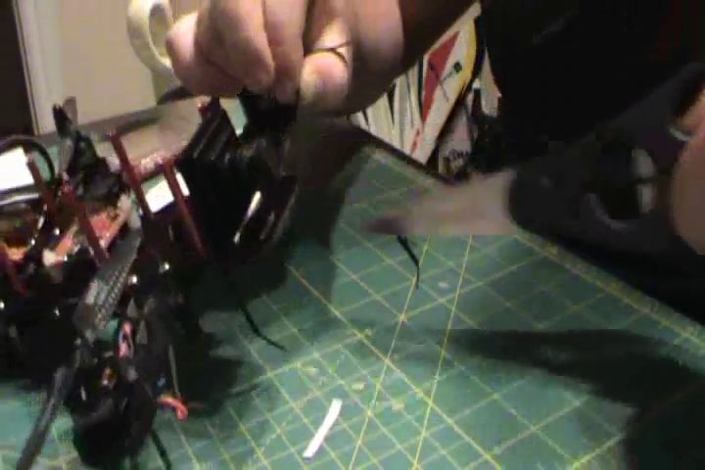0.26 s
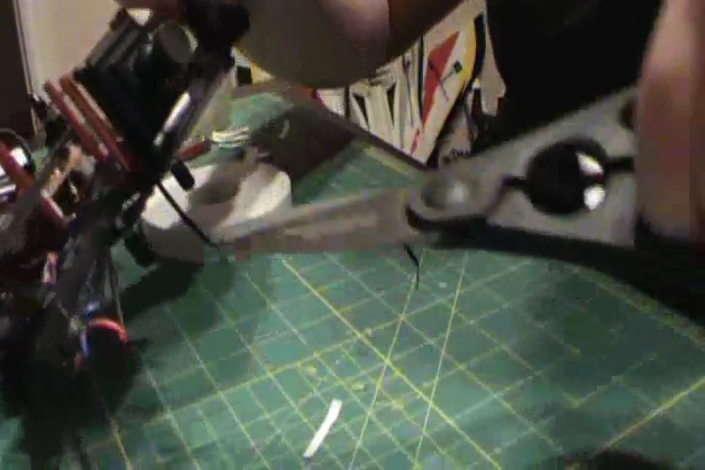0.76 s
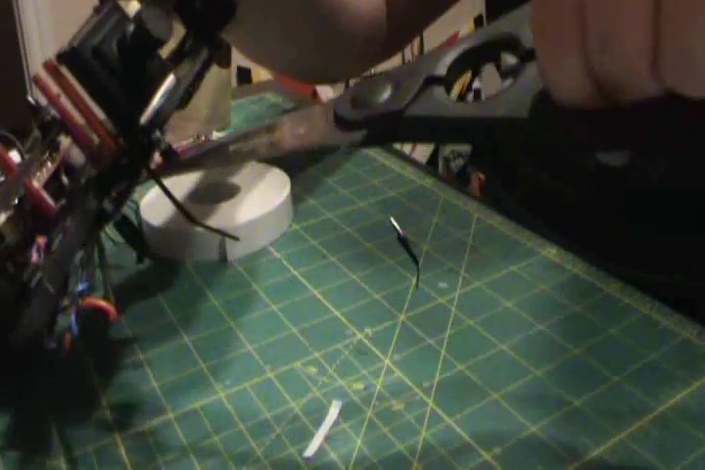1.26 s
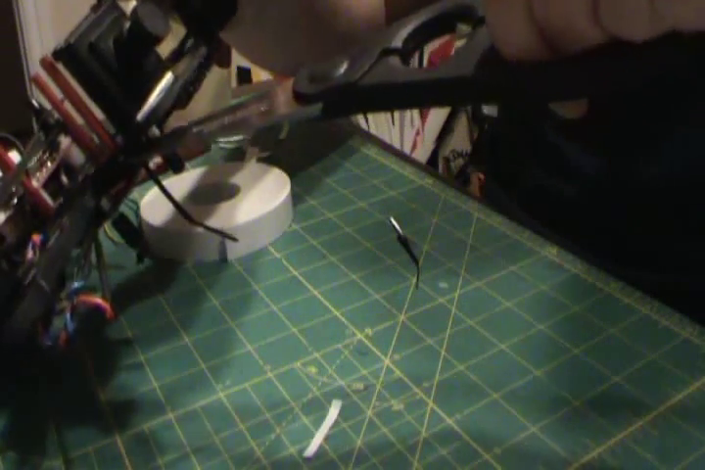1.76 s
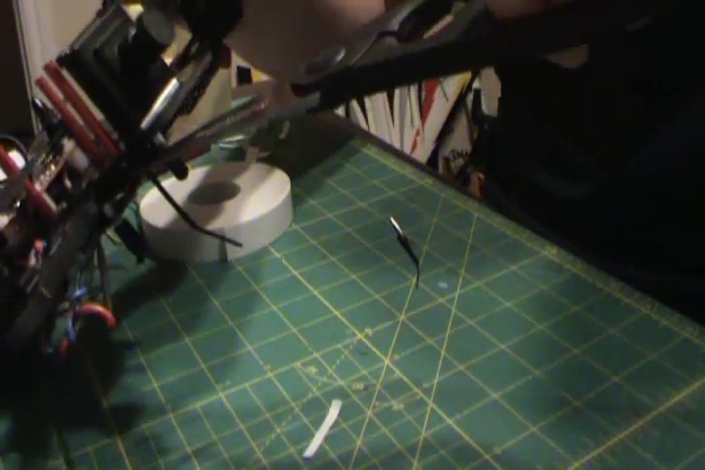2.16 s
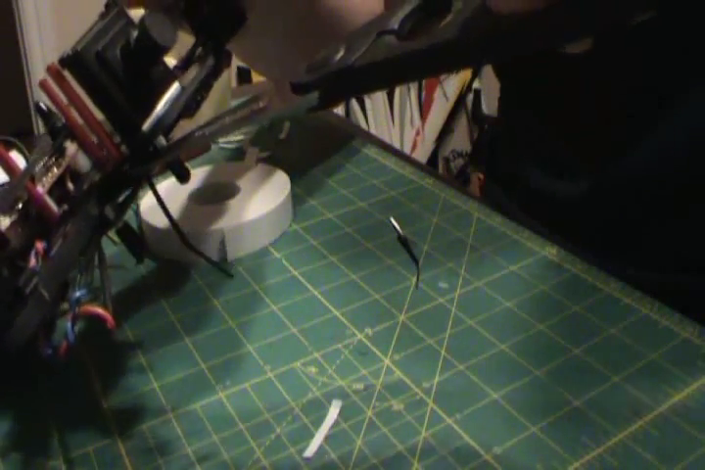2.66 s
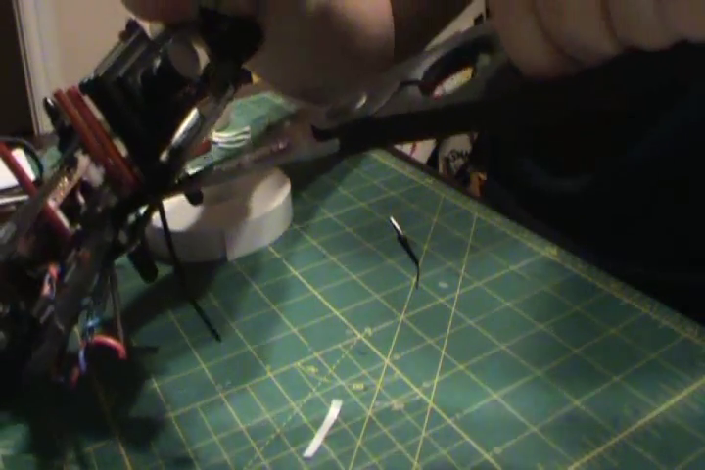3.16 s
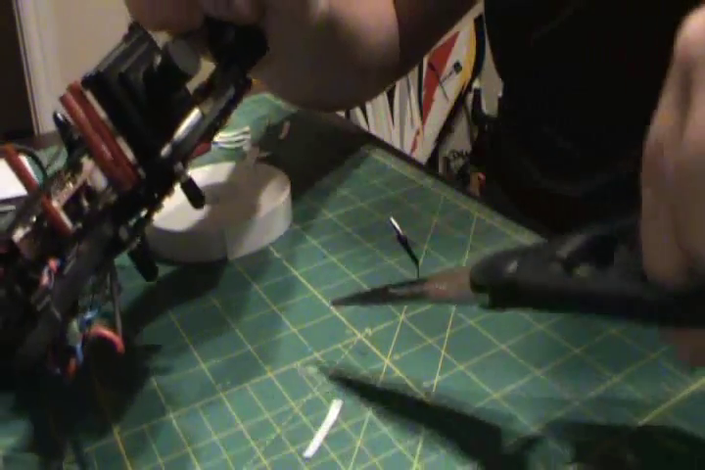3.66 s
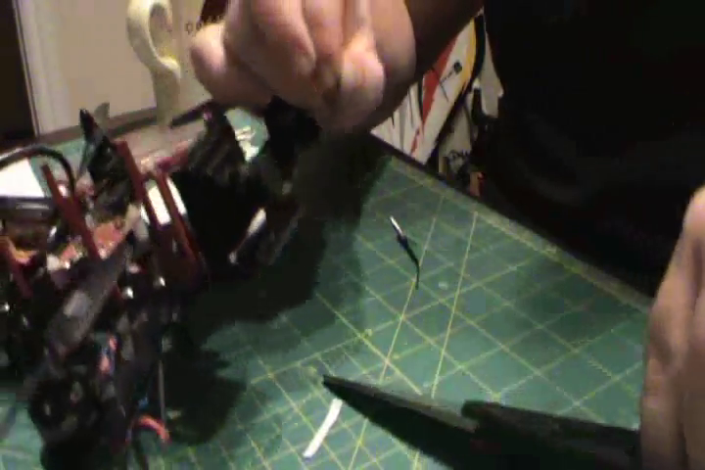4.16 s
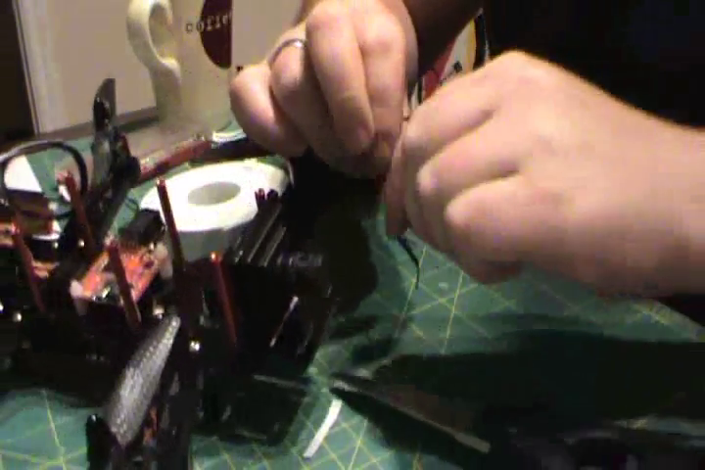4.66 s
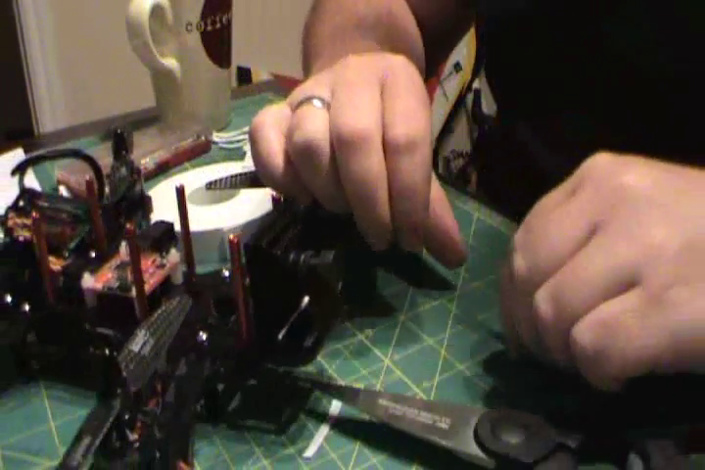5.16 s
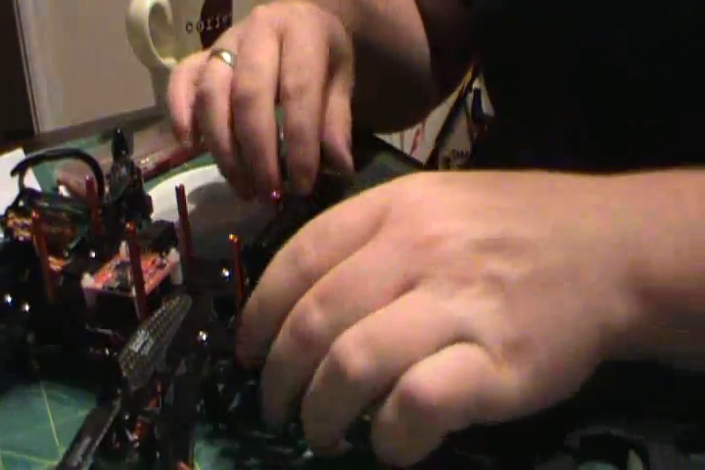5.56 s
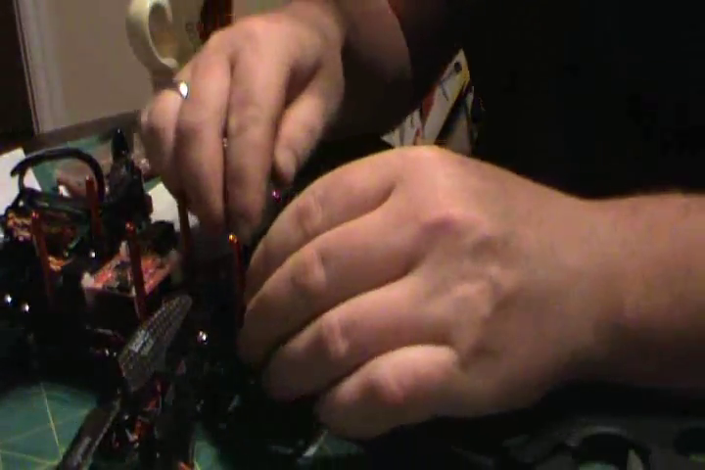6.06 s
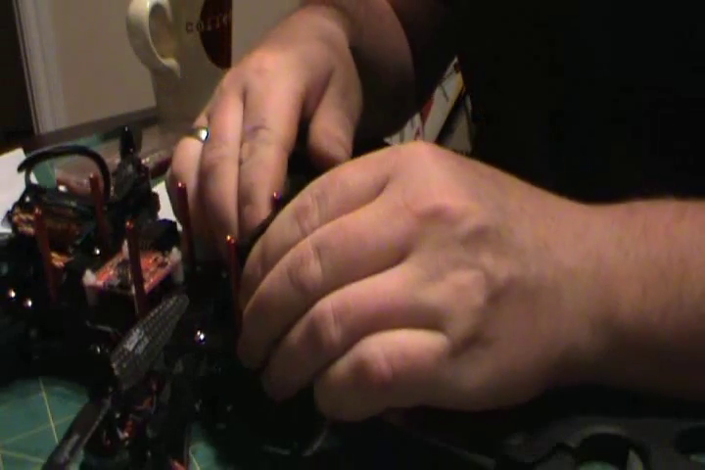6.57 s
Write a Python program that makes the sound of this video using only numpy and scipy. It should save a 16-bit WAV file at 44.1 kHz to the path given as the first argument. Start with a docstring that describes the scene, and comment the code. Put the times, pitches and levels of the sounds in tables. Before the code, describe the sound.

A scrape of blades fading at the start, then sparse bright metallic ticks on a quiet background of hiss and low hum. One loud, crisp snip through plastic comes near the middle, with a hollow clack of handles. A solid knock on the work bench follows, then lighter plastic clatter, skin rubbing and tiny squeaks. Near microphone, short indoor reverberation, faint fluttering camera motor.

```python
"""Trimming a plastic tie

Scissors trim a plastic zip tie on a small frame over a work bench in a little room.
Struck blades, plastic and bench are sums of decaying modes with noise bursts at the contact.
Shearing and handling are noise shaped in spectrum and force; squeaks are narrow resonant noise.
A camera's stepping focus motor rings its lens barrel faintly, over steady background noise,
partly the camera's own internal noise, and a low hum."""
import sys
import numpy as np
from scipy import signal
from scipy.io import wavfile
from scipy.ndimage import uniform_filter1d

SR = 44100
rng = np.random.default_rng(int(sys.argv[2]) if len(sys.argv) > 2 else 0)


def put_to_file(sound):
    """Save the sound as 16-bit audio at rate SR, in the file named by the first command-line argument."""
    columns = np.atleast_2d(sound).T  # one column per channel
    safe = np.clip(columns, -1, 1)
    whole_steps = np.round(safe * 32767)
    wavfile.write(sys.argv[1], SR, whole_steps.astype(np.int16))


N = 299880
TIME = np.arange(N) / SR   # [s]
BLOW = TIME[:SR // 3]   # time axis of a single contact [s]

# Edge along edge: strokes of the shears (time of full force [s], level [dB])
SHEAR_STROKES = [(-0.02, -32.5), (3.226, -20), (6.779, -58)]
# Shearing friction: (frequency [Hz], relative level per hertz [dB])
SHEAR_SPECTRUM = [(200, -17), (420, -12), (700, -11), (1300, -11.5), (2000, -13), (2700, 10.5),
                  (4000, -5.5), (5500, 11.5), (7500, 0), (10500, 2), (13000, -18), (16000, -24)]
# Handles meeting their stop: (time [s], hollow clack level [dB], steel snap level [dB])
HANDLE_CLOSINGS = [(3.3091, -19, -21), (3.418, -36.5, -66), (3.459, -45, -72)]
# Modes of the hollow handles: (frequency [Hz], level [dB], t60 [s])
HANDLE_MODES = [(600, -6, 0.021), (900, -6.5, 0.033), (1097, -4, 0.02), (1400, 1.5, 0.013),
                (1760, -4, 0.009), (2320, 0, 0.016), (4440, 4.5, 0.0054)]
# Modes of the steel blades: (frequency [Hz], level [dB], t60 [s])
BLADE_MODES = [(5800, -7, 0.16), (6700, -1, 0.46), (8210, 16, 0.083), (8830, -15, .3), (9140, -8, 0.12),
               (10700, -6, 0.146)]
# Light touches of blades and ties:
# (time [s], pitch [Hz], snap level [dB], body level before TICK_BODY_TRIM_DB [dB], left-right [dB])
TICK_EVENTS = [(0.081, 9900, -31, -33.5, 2), (0.151, 3120, -47, -43, 0), (0.1891, 10300, -41, -38, 2),
               (0.443, 8350, -47, -59, -5), (0.49, 6200, -51, -40, 2), (0.499, 9300, -48.5, -59, 6),
               (1.093, 3170, -48.5, -52, 0), (1.3901, 10200, -38.5, -72, -4),
               (1.4271, 9900, -38.5, -70, -3.5), (1.637, 9010, -46, -66, -3), (1.776, 9700, -34.5, -70, -3),
               (1.8705, 9300, -32.5, -52, -3), (2.031, 3080, -56, -44, 2), (2.478, 12900, -48, -62, 2),
               (2.5074, 9400, -40.5, -75, 1), (2.5427, 8790, -49, -48, 6), (3.1953, 12300, -28, -49, 2),
               (3.495, 5660, -42.5, -44, 3), (3.707, 9000, -48, -40.5, -2), (4.5794, 10700, -42, -47, 2),
               (5.1143, 3330, -46.5, -58, -6), (5.155, 4190, -62, -38.5, -4), (5.8859, 9070, -36, -39, 2.5),
               (5.977, 11440, -34, -40.5, 1), (6.69, 3010, -56, -41.5, -7), (6.7468, 6200, -49, -48, 6)]
# Scissors and frame meeting the bench, levels before the KNOCK trims; left-right is for clack and crack:
# (time [s], thud [dB], knock [dB], clack [dB], crack [dB], crack pitch [Hz], left-right [dB])
KNOCK_EVENTS = [(0.478, -41, -49.5, -47.5, -61, 2360, 1), (1.612, -44, -59, -65, -43.5, 3300, 2),
                (1.8705, -44, -52.5, -47.5, -37, 3700, -6), (2.191, -45.5, -56.5, -55, -49, 3150, -2),
                (2.32, -49.5, -77, -68, -71, 3300, 1), (2.886, -49.5, -60, -59, -69, 2510, 5),
                (3.7953, -18.5, -15.5, -22, -23.5, 4900, 2.5), (3.822, -38, -31.5, -31.5, -36, 2760, -6),
                (4.1713, -30, -21.5, -19.5, -29.5, 3050, -8), (4.2214, -29, -27, -39, -21, 7100, -7),
                (4.462, -44.5, -52, -70, -70, 3750, 2), (4.565, -43.5, -71, -67, -59, 2520, -4),
                (4.794, -34, -38.5, -51, -29.5, 7400, -6.5), (4.821, -44.5, -47, -60, -64, 4000, -3),
                (4.875, -32, -31.5, -26.5, -19.5, 3020, -8), (4.919, -43, -44, -38.5, -54, 3200, -2),
                (4.985, -39, -44.5, -48, -50, 4030, 2), (5.297, -55, -52, -54, -62, 3000, 0),
                (6.774, -46.5, -42, -46.5, -41.5, 4760, -8)]
# Modes of the bench top: (frequency [Hz], level [dB], t60 [s])
BENCH_MODES = [(97, -15, 0.13), (110, 1.5, 0.25), (151.7, 1, 0.12), (194, -2.5, 0.16), (262, -4, 0.15),
               (330, -29, .09), (433, 1, 0.16), (467.7, 3.5, 0.089), (573.8, 4, 0.12), (661, -9, 0.099),
               (737, -10, 0.016), (865, -1, .09), (1010, -9, 0.057), (1120, 11, 0.07)]
# Modes of plastic handles and frame: (frequency [Hz], level [dB], t60 [s])
PLASTIC_MODES = [(1130, 8.5, 0.008), (1680, 12, 0.019), (1890, 5.5, 0.04), (2025, 8.5, 0.028),
                 (2200, -17, 0.047), (3230, 14, 0.004), (3190, 7, 0.022)]
# Brief squeaks, and near 10 kHz a faint thin high tone:
# (start [s], length [s], pitch [Hz], nominal width [Hz], level [dB])
SQUEAK_EVENTS = [(0.107, 0.1, 1680, 120, -61.5), (4.467, 0.65, 566, 60, -57),
                 (4.985, 0.051, 3140, 200, -51), (5.156, 0.056, 2200, 1400, -55),
                 (5.61, 0.04, 7800, 500, -63), (5.972, 0.025, 6420, 200, -53.5),
                 (6.0, .24, 10450, 300, -74), (6.773, 0.025, 4960, 700, -45)]
# Fingers shifting on the frame: (time of firmest grip [s], length [s], dull rub [dB], dry rustle [dB])
GRIP_EVENTS = [(0.0, 0.31, -47, -52), (0.438, 0.12, -55.5, -57), (1.077, 0.076, -65, -61),
               (3.506, 0.054, -62, -50), (4.27, 0.34, -53, -60.5), (4.76, 0.22, -50.5, -61),
               (5.024, 0.15, -52.5, -57), (5.173, 0.11, -58, -56), (5.924, 0.13, -53.5, -61),
               (6.113, 0.11, -60, -79), (6.5, 0.11, -54, -71), (6.79, 0.11, -53, -72)]
# Dull rubbing: (frequency [Hz], relative level per hertz [dB])
RUB_SPECTRUM = [(60, -3), (150, -2.5), (350, 0), (600, -5), (1000, -14), (2500, -33.5), (16000, -63)]
# Dry rustle, also the hiss of the gears: (frequency [Hz], relative level per hertz [dB])
RUSTLE_SPECTRUM = [(300, 1), (1200, -6), (3200, 0.5), (5500, -7), (9500, -5.5), (13000, -22), (16000, -21)]
# Focus motor runs: (start [s], end [s], level before variation by move [dB], share of quick moves [0-1])
FOCUS_RUNS = [(0.448, .75, -61, .4), (.75, 1.8, -61, 0.01), (1.8, 2.56, -61.5, .45),
              (3.558, 6.8, -60.5, 0.01)]
# Resonances of the lens barrel: (frequency [Hz], width [Hz], level [dB])
BARREL_RESONANCES = [(1940, 117, -3), (2135, 81, -6), (2954, 110, -9.5), (3750, 160, -13), (4830, 160, -9),
                     (5960, 140, -10)]
# Reverberation time of the room: (frequency [Hz], t60 [s])
ROOM_DECAY = [(100, 0.23), (500, 0.29), (2000, 0.29), (5000, 0.33), (10000, 0.22), (16000, .24)]
# Spectrum of the reverberation: (frequency [Hz], relative level [dB])
ROOM_SPECTRUM = [(60, -16), (300, 2.5), (1500, 4), (5000, -1), (10000, -1), (16000, -17)]
# Stereo likeness of reverberation and friction: (frequency [Hz], left-right correlation [-1 to 1])
ROOM_CORRELATION = [(100, 0.98), (300, 0.81), (700, 0.39), (1500, 0.12), (4000, 0.13), (9000, 0.42),
                    (15000, 1)]
# Steady background noise, partly the camera's own: (frequency [Hz], relative level per hertz [dB])
FLOOR_SPECTRUM = [(20, -20), (40, -11.5), (80, -10.5), (115, -10), (170, -9.5), (230, -15), (320, -7.5),
                  (470, -17), (700, -20.5), (1400, -23.5), (2100, -18.5), (3000, -27), (5000, -29),
                  (15500, -34)]
# Stereo likeness of the background noise: (frequency [Hz], left-right correlation [-1 to 1])
FLOOR_CORRELATION = [(30, 1), (100, 0.93), (220, 0.8), (400, .6), (700, -0.28), (1300, -0.68),
                     (2400, -0.65), (4400, -0.11), (8000, 0.21), (13000, 1)]
# Tones of mains and electronics: (frequency [Hz], rms level [dB])
HUM_TONES = [(119.5, -66.5), (240, -68), (15734, -79.5)]

# the row of snaps in which the tie gives way
SNIP_S, SNAP_EVERY_S, SNAP_HZ = 3.2049, 0.0087, 7700
SNAP_DB, SNAP_BODY_DB, SNAP_PAN_DB = -18.5, -22.5, -3.5   # body before its trim; mean pan
STROKE_ATTACK_S, STROKE_HOLD_S = 0.028, 0.013
STROKE_FADE_DB_PER_S, STROKE_LENGTH_S = 185, 0.24
TICK_TOP_HZ, TICK_LOW_SHARE = 14400, 0.46   # snap's upper edge; its lower edge as a share of pitch
TICK_EDGE_HZ, TICK_EDGE_DB = 12600, -10.5   # thin ping of the cutting edge, against the snap
TICK_BODY_TRIM_DB = -9.0
TICK_ROOM_SHARE = 0.89   # ticks are near the microphone and wake the room less
# share of ticks with a faint second touch, its mean delay and its level (body before its trim)
RETOUCH_SHARE, RETOUCH_S, RETOUCH_DB = 0.27, 0.044, -54.5
CRACK_LOW_HZ, CRACK_TOP_HZ = 2360, 10300
CLACK_LAG_S, BENCH_LAG_S = 0.00098, 0.000926   # plastic and bench answer just after the crack
KNOCK_CLACK_TRIM_DB, KNOCK_BENCH_TRIM_DB = -2.5, -1.5
GRIP_ATTACK_SHARE, GRIP_EDGE_DB = 0.46, 11   # share spent swelling; how far down at both ends
FOCUS_RAMP_S, GEAR_HISS_DB = 0.06, -5   # time to start and stop; gears against the run level
QUICK_SPEED, WHINE_DB = 1.23, -4.5   # quick against slow; level setting of the whine, doubled on use
FLOOR_DB = -56.5
CUTOFF_HZ = 16000


def snip(count):
    """Fracture: the tie gives way between the edges in a quick, evenly spaced row of snaps."""
    out, blades = np.zeros((2, N)), mode_waves(BLADE_MODES)
    for k in range(count):
        pan_db = SNAP_PAN_DB + 3 * rng.standard_normal()
        add(out, SNIP_S + k * SNAP_EVERY_S, tick(blades, SNAP_HZ, SNAP_DB, SNAP_BODY_DB), pan_db)
    return out


def shear(bands):
    """Sliding friction: edges grind in an uneven run of slips; each stroke bites, holds and runs out."""
    force = 0
    for s, db in SHEAR_STROKES:
        age = TIME - s
        bite = np.clip(1 + age / STROKE_ATTACK_S, 0, 1) * (age < STROKE_LENGTH_S)
        fade_db = STROKE_FADE_DB_PER_S * np.maximum(age - STROKE_HOLD_S, 0)
        force = force + bite * from_db(db - fade_db)
    slips = rms_one(from_db(2.8 * drift(rate=900)))
    return force * slips * coloured(bands, SHEAR_SPECTRUM)


def closings():
    """Modal impact: the blades snap past each other as the hollow handles clack together."""
    out, handles = np.zeros((2, N)), mode_waves(HANDLE_MODES)
    for s, clack_db, snap_db in HANDLE_CLOSINGS:
        contact = band(crunch(t60=0.0038), 440, 3800)
        clack = loudest_one(ring(handles) + from_db(10) * contact, size=128)
        steel = snap(11200, t60=0.0048, width_hz=710, broad_db=-3, low_hz=2330, top_hz=13000)
        add(out, s, from_db(clack_db) * clack + from_db(snap_db) * steel, pan_db=4.0)
    return out


def ticks():
    """Light impact: blades and ties touch; some touch again, faintly, a moment later."""
    out, blades = np.zeros((2, N)), mode_waves(BLADE_MODES)
    for s, hz, snap_db, body_db, pan_db in TICK_EVENTS:
        add(out, s, tick(blades, hz, snap_db, body_db), pan_db)
        chance, wait = rng.random(2)
        again = tick(blades, hz, RETOUCH_DB, RETOUCH_DB)
        again_s = min(s + RETOUCH_S * (0.5 + wait), TIME[-1])
        add(out, again_s, (chance < RETOUCH_SHARE) * again, pan_db)
    return out


def tick(blades, hz, snap_db, body_db):
    """Two parts summed: a bright snap that rings on faintly, and a hollow plastic body."""
    pitch = np.sin(2 * np.pi * hz * BLOW) * from_db(-60 * BLOW / 0.098)
    steel = from_db(-33) * ring(blades) + from_db(-28.0) * pitch
    low_hz = TICK_LOW_SHARE * hz
    bright = snap(hz, t60=0.014, width_hz=1160, broad_db=-15, low_hz=low_hz, top_hz=TICK_TOP_HZ)
    edge = loudest_one(resonate(crunch(t60=0.005), TICK_EDGE_HZ, 1800), size=128)
    bright = bright + steel + from_db(TICK_EDGE_DB) * edge
    burst = crunch(t60=0.022)
    body = band(burst, 1450, 3570) + from_db(-3.5) * band(burst, 250, 2060)
    body = loudest_one(body, size=128)
    return from_db(snap_db) * bright + from_db(body_db + TICK_BODY_TRIM_DB) * body


def knocks():
    """Plate impact: a hard crack, then almost at once the bench top's boom and a clack of plastic."""
    out, deep = np.zeros((2, N)), np.array(BENCH_MODES)[:, 0] < 370
    bench, plastic = mode_waves(BENCH_MODES), mode_waves(PLASTIC_MODES)
    for s, thud_db, knock_db, clack_db, crack_db, hz, pan_db in KNOCK_EVENTS:
        thud = spread(bench[deep], side=0.25) + from_db(21.5) * crunch(t60=0.078)
        thud = loudest_one(band(thud, 115.5, 285), size=512)
        knock = spread(bench[~deep], side=0.79) + from_db(26.5) * crunch(t60=0.051)
        knock = loudest_one(band(knock, 317, 877), size=256)
        clack = ring(plastic) + from_db(8) * band(crunch(t60=0.018), 590, 1330)
        clack = loudest_one(clack, size=128)
        crack = snap(hz, t60=0.0098, width_hz=1460, broad_db=-7,
                     low_hz=CRACK_LOW_HZ, top_hz=CRACK_TOP_HZ)
        boom = from_db(thud_db) * thud + from_db(knock_db) * knock
        add(out, s, from_db(crack_db) * crack, pan_db)
        add(out, s + BENCH_LAG_S, from_db(KNOCK_BENCH_TRIM_DB) * boom, pan_db=-2.5)
        add(out, s + CLACK_LAG_S, from_db(clack_db + KNOCK_CLACK_TRIM_DB) * clack, pan_db)
    return out


def snap(hz, t60, width_hz, broad_db, low_hz, top_hz):
    """Sudden release: a break and a short crunch in one broad resonance; a low snap is also duller."""
    burst = crunch(t60) + 3 * (BLOW == 0)
    sound = resonate(burst, hz, width_hz) + from_db(broad_db) * burst
    return loudest_one(band(sound, low_hz, min(2.6 * hz, top_hz)), size=128)


def squeaks():
    """Narrow-band resonance: each squeak or thin tone is filtered noise that swells and fades."""
    out = np.zeros(N)
    for s, length, hz, width_hz, db in SQUEAK_EVENTS:
        once = resonate(rng.standard_normal(N), hz, 1.2 * width_hz)
        tone = rms_one(resonate(once, hz, 1.2 * width_hz))
        out += from_db(db) * tone * np.sin(np.pi * np.clip((TIME - s) / length, 0, 1))
    return out


def hands(bands):
    """Skin friction: fingers rub the frame and catch on wires and ties; each grip swells and lets go."""
    rub_gain, rustle_gain = 0, 0
    for s, length, rub_db, rustle_db in GRIP_EVENTS:
        part = (TIME - s) / length
        distance = np.maximum(-part / GRIP_ATTACK_SHARE, part / (1 - GRIP_ATTACK_SHARE))
        pressure = from_db(-GRIP_EDGE_DB * np.minimum(distance, 10))
        rub_gain = rub_gain + from_db(rub_db) * pressure
        rustle_gain = rustle_gain + from_db(rustle_db) * pressure
    rub = rub_gain * from_db(2 * drift(rate=32)) * coloured(bands, RUB_SPECTRUM)
    catches = rms_one(from_db(2 * drift(rate=45) + 4 * drift(rate=600)))
    return rub + rustle_gain * catches * coloured(bands, RUSTLE_SPECTRUM)


def focus_motor(step_hz, run_s, rough):
    """Forced resonance: thirty times a second a stepper's short run of steps rings the lens barrel."""
    frame_hz, start_s = 29.97, 0.0205
    gain, quick_share = focus_runs()
    frame, part = np.divmod((TIME - start_s) * frame_hz + 1, 1)
    move_age = part / frame_hz   # [s]
    chance = rng.random((int(frame[-1]) + 1, 2))[frame.astype(int)]
    quick = chance[:, 0] < quick_share
    speed = np.where(quick, QUICK_SPEED, 1) * (1 + 0.015 * drift(rate=300))
    turned = np.cumsum(step_hz * speed) / SR   # steps so far
    steps = np.diff(np.floor(turned), prepend=0)
    drive = rms_one(steps) + rough * rng.standard_normal(N)
    whole = drive * np.sin(np.pi * np.minimum(move_age / run_s, 1))
    first_half = drive * np.sin(np.pi * np.minimum(move_age / (run_s / 2), 1))
    # the lowest resonance is driven through the whole run, the higher ones only as it sets off
    tone = 0
    for k, (hz, width_hz, db) in enumerate(BARREL_RESONANCES):
        tone = tone + from_db(db) * rms_one(resonate(first_half if k else whole, hz, width_hz))
    # a quick move rings less and adds a shorter whine at twice the step rate
    whine = np.sin(2 * np.pi * 2 * turned) * np.sin(np.pi * np.minimum(move_age * QUICK_SPEED / run_s, 1))
    tone = np.where(quick, from_db(-3.5) * tone + 2 * from_db(WHINE_DB) * whine, tone)
    sides = np.array([[0.6], [1.3]])   # louder on the right
    return gain * from_db(-5 + 2 * chance[:, 1]) * tone * sides


def focus_runs():
    """Gating: the motor's gain and its share of quick moves, as it starts and stops."""
    gain, quick_share = 0, 0
    for start, end, db, share in FOCUS_RUNS:
        running = np.clip(0.5 + np.minimum(TIME - start, end - TIME) / FOCUS_RAMP_S, 0, 1)
        gain, quick_share = gain + from_db(db) * running, quick_share + share * running
    return gain, quick_share


def focus_gears(bands):
    """Gear friction: a dry, grainy hiss while the motor runs."""
    gain, _ = focus_runs()
    grain = rms_one(from_db(4 * drift(rate=600)))
    return gain * from_db(GEAR_HISS_DB) * grain * coloured(bands, RUSTLE_SPECTRUM)


def room(x, wet_db, first_s):
    """Reverberation: convolution with noise that decays in each band at that band's own rate."""
    age = np.maximum(TIME[:SR // 2] - first_s, 0)
    tail = 0
    for hz, noise in stereo_bands(ROOM_CORRELATION, len(age)):
        level_db = at_hz(ROOM_SPECTRUM, hz) - 60 * age / at_hz(ROOM_DECAY, hz)
        tail = tail + from_db(level_db) * noise
    # a quick onset and a stronger early part
    tail = tail * (1 - np.exp(-age / 0.0013)) * (1 + 0.32 * np.exp(-age / 0.011))
    tail = rms_one(tail) / np.sqrt(len(age))
    wet = signal.fftconvolve(x.mean(0)[None], tail, axes=1)[:, :N]
    return x + from_db(wet_db) * wet


def background():
    """Stationary noise and pure tones: background noise, partly the camera's internal noise, and hum."""
    hum = 0
    for hz, db in HUM_TONES:
        hum = hum + from_db(db) * np.sqrt(2) * np.sin(2 * np.pi * hz * TIME)
    return from_db(FLOOR_DB) * coloured(stereo_bands(FLOOR_CORRELATION, N), FLOOR_SPECTRUM) + hum


def mode_waves(modes):
    """Modal decay: each mode is a sine that dies exponentially."""
    hz, db, t60 = np.transpose(modes)[:, :, None]
    return from_db(db - 60 * BLOW / t60) * np.sin(2 * np.pi * hz * BLOW)


def ring(waves):
    """Modal superposition: a blow excites each mode with a random strength and sign."""
    strength = from_db(2 * rng.standard_normal(len(waves)))
    return (strength * rng.choice([-1, 1], len(waves))) @ waves


def spread(waves, side):
    """Plate radiation: each mode reaches left and right with different strengths."""
    return ring(waves) + side * ring(waves) * np.array([[1], [-1]])


def crunch(t60):
    """Contact noise: a burst of tiny slips of random sign that decays exponentially."""
    return rng.choice([-1, 1], len(BLOW)) * from_db(-60 * BLOW / t60)


def resonate(x, hz, width_hz):
    """Simple resonator: a two-pole filter with gain near 1 at its peak."""
    r = np.exp(-np.pi * width_hz / SR)
    zeros = np.array([1, 0, -1]) * (1 - r * r) / 2
    return signal.lfilter(zeros, [1, -2 * r * np.cos(2 * np.pi * hz / SR), r * r], x)


def band(x, low_hz, high_hz, order=2):
    """Causal band-pass filtering."""
    edges = [low_hz, min(high_hz, 0.47 * SR)]
    return signal.sosfilt(signal.butter(order, edges, "band", fs=SR, output="sos"), x)


def stereo_bands(likeness, size):
    """Partial coherence: half-octave noise as mid plus side, yielding (centre [Hz], band)."""
    white = rng.standard_normal((2, 2, size))
    edges = 22 * 2 ** np.arange(0, 10, 0.5)
    for k, (low, high) in enumerate(zip(edges, edges[1:])):
        mid, side = band(white[k % 2], low, high)
        hz = np.sqrt(low * high)
        alike = np.clip(at_hz(likeness, hz), -1, 1)
        yield hz, np.sqrt(1 + alike) * mid + np.sqrt(1 - alike) * side * [[1], [-1]]


def coloured(bands, spectrum):
    """Spectral shaping: weighted noise bands summed to rms 1."""
    return rms_one(sum(from_db(at_hz(spectrum, hz)) * x for hz, x in bands))


def at_hz(points, hz):
    """Interpolation on a logarithmic frequency axis."""
    f, value = np.transpose(points)
    return np.interp(np.log(hz), np.log(f), value)


def drift(rate):
    """Random modulation: `rate` random knots a second, joined by lines, with rms 1."""
    knots = rng.standard_normal(int(N / SR * rate) + 2)
    return rms_one(np.interp(TIME * rate, np.arange(len(knots)), knots))


def from_db(db):
    """Logarithmic level to amplitude gain."""
    return 10 ** (np.asarray(db) / 20)


def rms_one(x):
    """Energy normalisation to rms 1."""
    return x / np.sqrt(np.mean(x ** 2) + 1e-20)


def loudest_one(x, size):
    """Short-time normalisation: the loudest stretch of `size` samples gets rms 1."""
    return x / np.sqrt(uniform_filter1d(x ** 2, size, mode="constant").max() + 1e-20)


def add(out, s, sound, pan_db):
    """Superposition: place a sound in time, with a level difference between left and right."""
    start = max(round(s * SR), 0)
    sides = from_db([[pan_db / 2], [-pan_db / 2]])
    out[:, start:start + len(BLOW)] += (sides / sides.mean() * sound)[:, :N - start]


def scene():
    """Superposition of the work in its room, the handling and the steady sounds."""
    friction, near = list(stereo_bands(ROOM_CORRELATION, N)), ticks()
    work = TICK_ROOM_SHARE * near + snip(count=4) + closings() + knocks() + shear(friction) + squeaks()
    work = room(work, wet_db=-8.5, first_s=0.001) + (1 - TICK_ROOM_SHARE) * near
    camera = focus_motor(step_hz=962, run_s=0.028, rough=0.97) + focus_gears(friction)
    return work + hands(friction) + background() + camera


def record(dry):
    """Band limiting: a steep elliptic low-pass cuts the top."""
    return signal.sosfilt(signal.ellip(10, 0.2, 70, CUTOFF_HZ, fs=SR, output="sos"), dry)


dry = scene()
out = record(dry)
put_to_file(out)
```